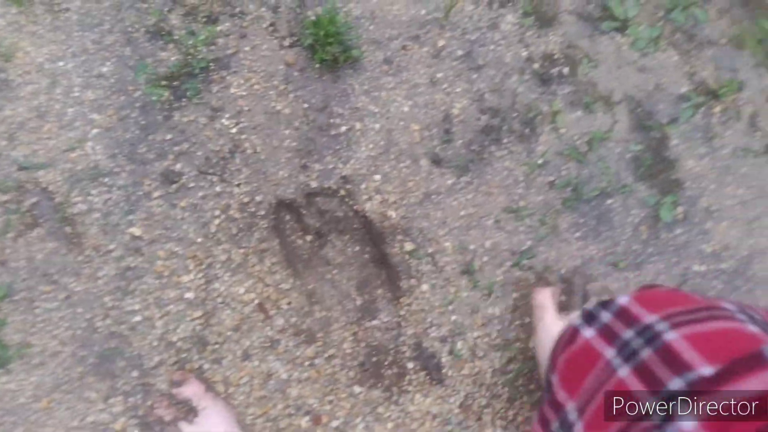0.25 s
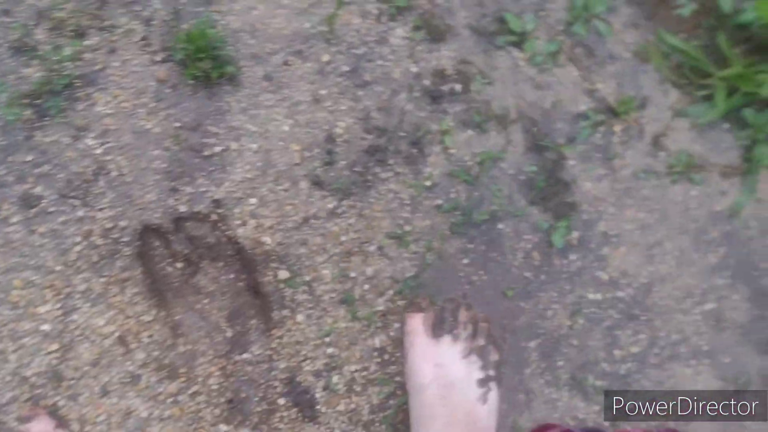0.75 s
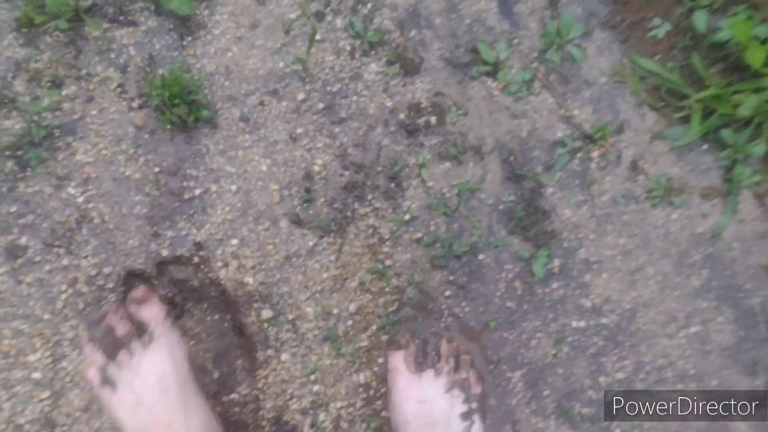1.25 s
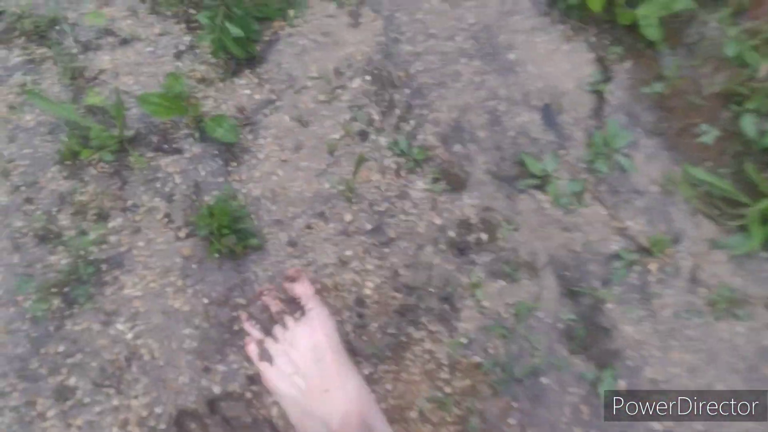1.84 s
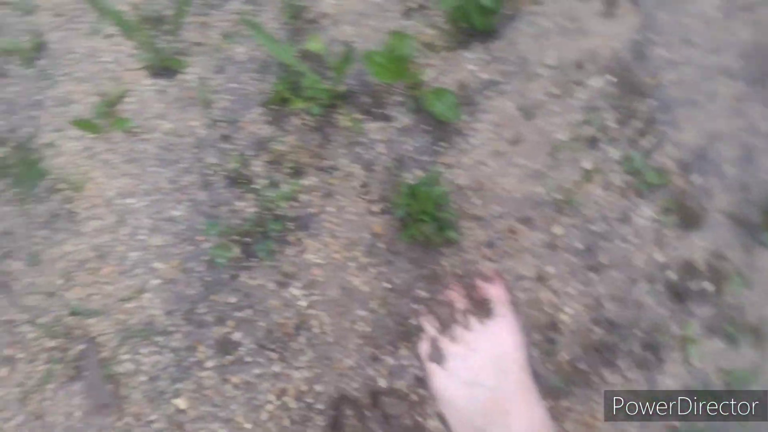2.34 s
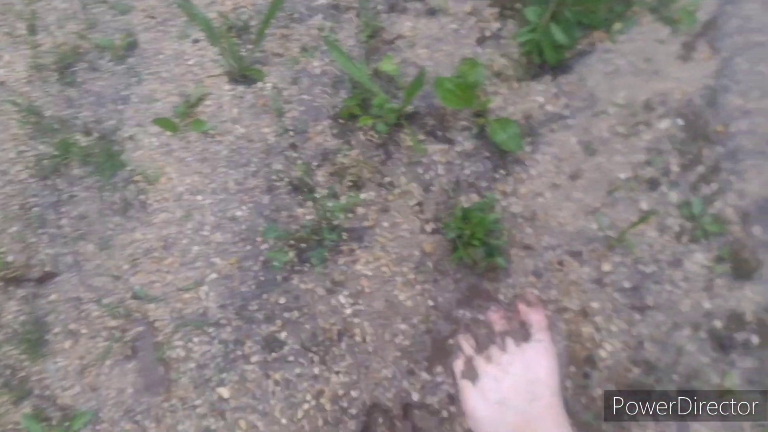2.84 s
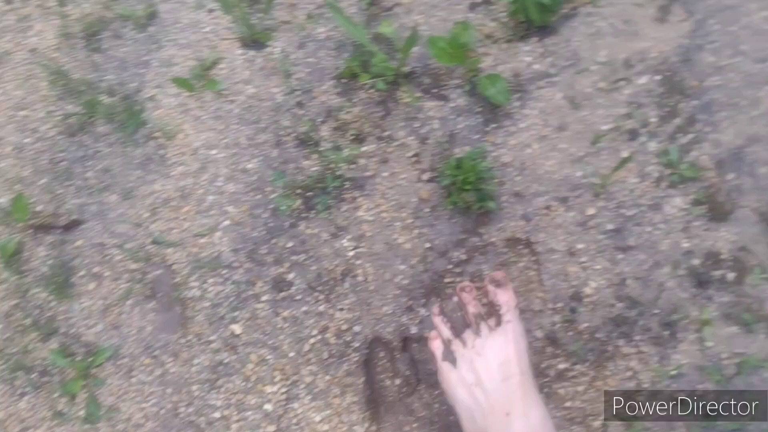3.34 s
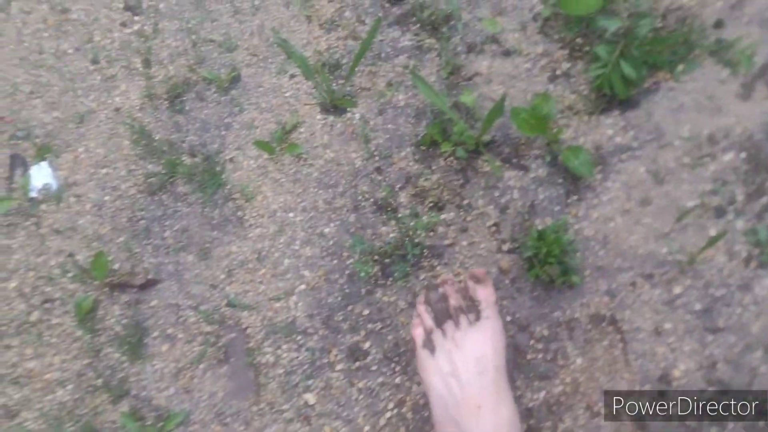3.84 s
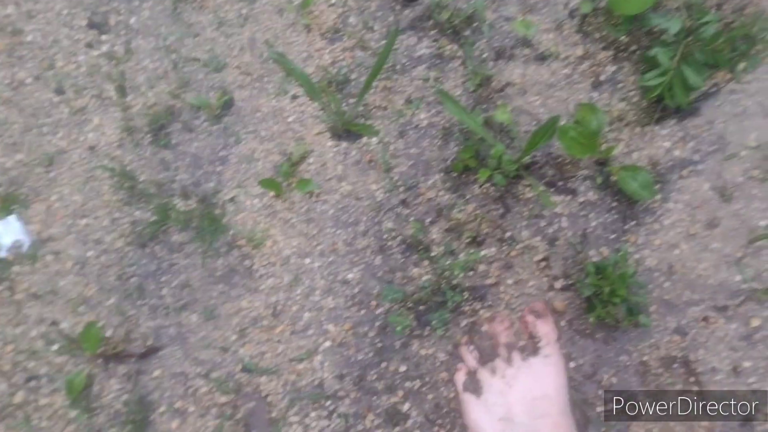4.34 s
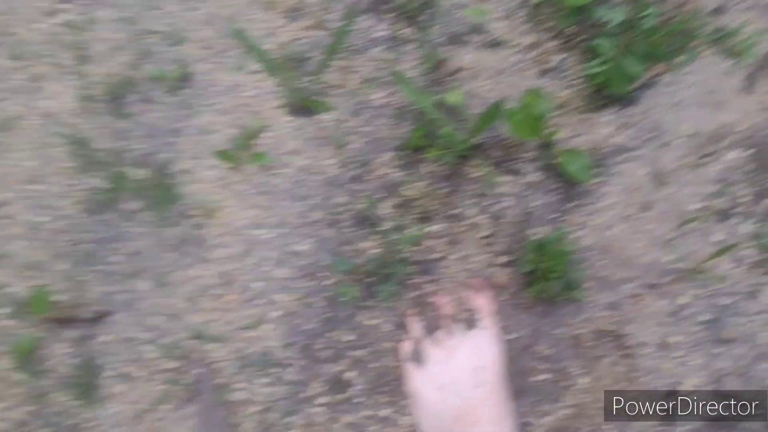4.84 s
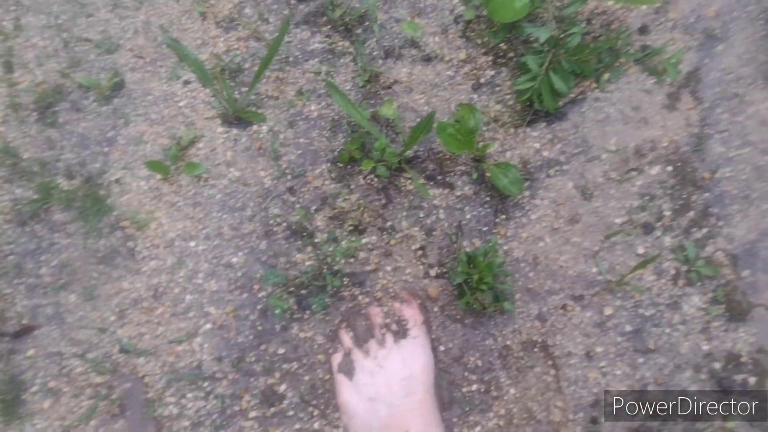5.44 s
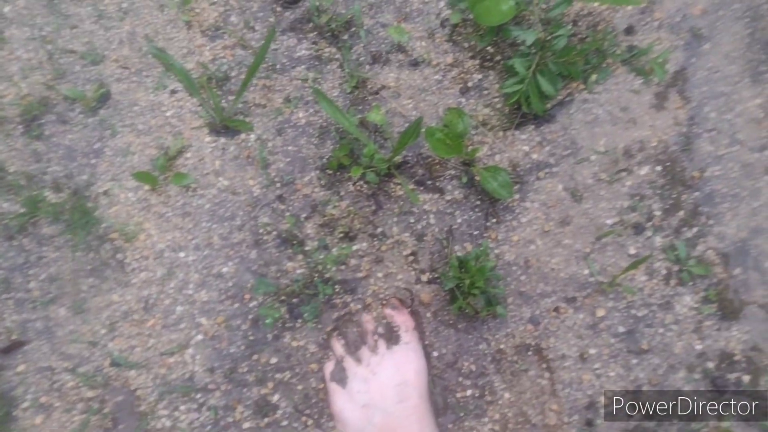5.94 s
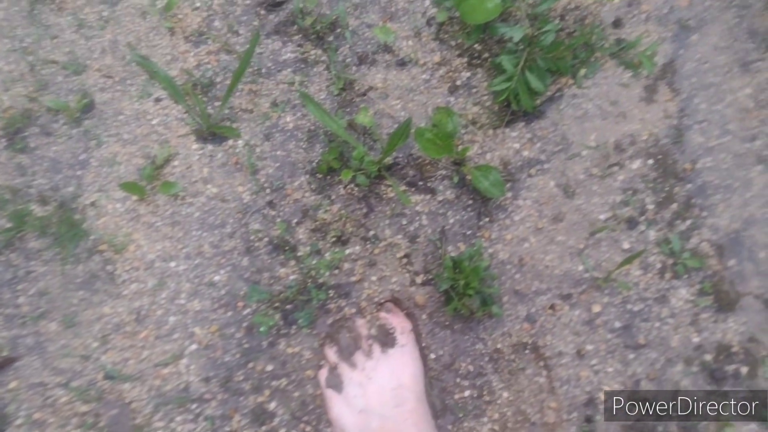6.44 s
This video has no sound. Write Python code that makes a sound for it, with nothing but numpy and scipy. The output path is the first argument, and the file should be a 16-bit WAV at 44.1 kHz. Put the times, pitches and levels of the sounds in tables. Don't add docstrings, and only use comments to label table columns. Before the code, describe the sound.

Steady fine rain hiss with small drops and tiny wet grains crackling underneath. Hard, dry casing knocks and soft low thumps arrive in irregular bunches, strongest before two seconds and around four, where grit rasps very briefly underfoot. Handling rustle and rumble swell with the movement, then settle into a sparse stretch with a few final taps. Very close microphone, outdoors without echo, left-heavy, the right port covered by a finger.

```python
import sys
import numpy as np
from scipy import signal
from scipy.fft import rfft, irfft, next_fast_len
from scipy.io import wavfile
from scipy.ndimage import map_coordinates

SR = 44100
rng = np.random.default_rng(int(sys.argv[2]) if len(sys.argv) > 2 else 0)


def master(y):
    cut = np.clip(np.atleast_2d(y).T, -1, 1)
    pcm = np.round(cut * 32767)
    wavfile.write(sys.argv[1], SR, pcm.astype(np.int16))


def natural_amplitude(level_db):
    exponent = np.asarray(level_db, float) / 20
    return 10 ** exponent


N = 295533
TIME = np.arange(N) / SR

# time in seconds, movement in dB over stillness.
MOVEMENT = [(0.0, 8), (0.2, 1.5), (0.86, 0), (1.27, 2), (1.92, 4), (2.07, 8), (2.22, 2.5), (2.48, 1.5),
            (3.28, 0), (3.58, 5), (3.78, 10), (4.03, 8), (4.23, 6.5), (4.38, 4.5), (4.59, 0), (6.31, 0.5),
            (6.57, 3), (6.7, -1.5)]
POLARITY = 0.6
SHELL_HZ = 2050


def unit(x):
    return x / np.sqrt(np.mean(x ** 2) + 1e-20)


def curve(rows):
    s, db = np.transpose(rows)
    return np.interp(TIME, s, db)


def wobble(rate):
    knots = rng.standard_normal(int(N * rate / SR) + 4)
    return map_coordinates(knots, [np.arange(N) * rate / SR])


def filtered(x, response):
    m = next_fast_len(N + SR // 2)
    return irfft(rfft(x, m) * response(np.fft.rfftfreq(m, 1 / SR)), m)[..., :N]


def highpass(x, edge_hz, order):
    return filtered(x, lambda f: (1j * f / edge_hz / (1 + 1j * f / edge_hz)) ** order)


def hiss(spectrum, grain_db):
    f, level = np.transpose(spectrum)
    grains = natural_amplitude(grain_db * wobble(400)) * rng.standard_normal(N)
    return unit(filtered(grains, lambda hz: natural_amplitude(np.interp(np.log(hz + 1), np.log(f), level))))


def add(out, s, shape):
    part = out[max(round(s * SR), 0):][:len(shape)]
    part += shape[:len(part)]


def ring(hz, db, t60, rise_s, phase):
    t = np.arange(SR // 30) / SR
    envelope = natural_amplitude(db - 60 * t / t60) * (1 - np.exp(-t / rise_s))
    return envelope * np.sin(2 * np.pi * hz * t + phase)


def pluck(hz, db, turns, sag, phase):
    cycles = hz * np.arange(SR // 16) / SR
    swell = cycles / turns * np.exp(1 - cycles / turns)
    sagging = cycles * (1 - sag * (1 - np.exp(-cycles)))
    return natural_amplitude(db) * swell * np.sin(2 * np.pi * sagging + phase)


def crack(db, life_s):
    t = np.arange(SR // 100) / SR
    swell = t / life_s * np.exp(1 - t / life_s)
    return natural_amplitude(db) * swell * (np.diff(rng.standard_normal(len(t) + 1)) + 1)


def drone():
    # pitch in Hz, pitch wander in Hz, level in dB.
    motor_hums = [(122.3, 4.87, -76.5), (192, 7.26, -77), (240, 2.96, -66), (340, 4.75, -79)]
    out = np.zeros(N)
    for hz, wander_hz, db in motor_hums:
        strength = natural_amplitude(db + 8.0 + 2.3 * wobble(14))
        cycles = hz * TIME + np.cumsum(wander_hz * wobble(14)) / SR
        out += strength * np.sin(2 * np.pi * cycles)
    return out


def stir():
    # frequency in Hz, density in dB per Hz.
    rumble_spectrum = [(20, -45), (40, -46), (70, -5), (120, -1), (200, -3), (300, -5), (500, -61)]
    rustle_spectrum = [(120, -44), (250, -1), (350, -2), (700, -4.5), (1000, -10), (1600, -28.5)]
    rain_spectrum = [(500, -42), (900, -2), (1500, -0.5), (2300, 0.5), (2900, -1.5), (3500, -11),
                     (4500, -34)]
    fizz_spectrum = [(2500, -46), (3500, -2.5), (4500, 0.5), (5500, -4), (7000, -6), (10000, -12),
                     (15000, -21), (20000, -27)]
    grit_spectrum = [(500, 9), (2000, 0.5), (5500, 2.5), (9000, -5.5), (15000, -20), (20000, -23)]
    # time in seconds, level in dB.
    scrape_level = [
        (4.118, -130),
        (4.126, -62),
        (4.132, -39.5),
        (4.14, -36),
        (4.156, -37),
        (4.162, -50),
        (4.172, -45),
        (4.178, -60),
        (4.186, -130),
    ]
    still_db = (-70, -65, -61.5, -64.5)
    growth = (1.6, 0.9, 0.58, 0.011)
    movement_db = curve(MOVEMENT)
    rumble_db, rustle_db, rain_db, fizz_db = [db + k * movement_db for db, k in zip(still_db, growth)]

    lumps_db = 4.5 * np.tanh(wobble(30) / 1.5)
    rumble = natural_amplitude(rumble_db + 7.5 + lumps_db) * hiss(rumble_spectrum, grain_db=3)
    rustle = natural_amplitude(rustle_db + 3.5 + 2.17 * wobble(70)) * hiss(rustle_spectrum, grain_db=1.0)
    rain = natural_amplitude(rain_db + 7.5) * hiss(rain_spectrum, grain_db=0.53)
    fizz = natural_amplitude(fizz_db + 6.5) * hiss(fizz_spectrum, grain_db=1.03)
    gusts = natural_amplitude(0.8 * wobble(15))
    scrape = natural_amplitude(curve(scrape_level) - 0.3) * hiss(grit_spectrum, grain_db=5.0)
    return rumble + rustle + gusts * (rain + fizz) + scrape


def drizzle():
    out = np.zeros(N)
    for when, pitch, size, phase in rng.random((260, 4)):
        hz = 500 * 22 ** pitch
        db = -53 - 14 * pitch + 2.5 * size
        add(out, when * N / SR, ring(hz, db, t60=14 / hz, rise_s=0.00022, phase=2 * np.pi * phase))
    return out


def squelch():
    lowest_hz, span = 250, 9.7
    base_db, spread_db = -53.5, 4.5
    out = np.zeros(N)
    crowding = np.cumsum(natural_amplitude(2.7 * curve(MOVEMENT)))
    for when, pitch, size, phase in rng.random((150, 4)):
        hz = lowest_hz * span ** pitch
        db = base_db - 4.5 * pitch + spread_db * 2 * size ** 2
        s = np.searchsorted(crowding, when * crowding[-1]) / SR
        add(out, s, ring(hz, db, t60=9.5 / hz, rise_s=0.00033, phase=2 * np.pi * phase))
    return out


def covered_port():
    # frequency in Hz, density in dB per Hz.
    muffled_spectrum = [(20, -14), (60, 1), (130, 1), (250, -3), (500, -9.5), (800, -14.5), (1500, -48)]
    thin_spectrum = [(400, -30), (900, 1.5), (2500, 1.5), (3500, -0.5), (6000, -18.5), (12000, -7.5),
                     (20000, -9)]
    # time in seconds, pitch in Hz, level in dB.
    muffled_thumps = [
        (1.546, 180, -52),
        (3.786, 200, -62),
        (3.881, 300, -52.5),
        (3.9794, 330, -44),
    ]
    rub_s, rub_length_s = 3.95, 0.09
    leak = 0.3
    rub = np.exp(-((TIME - rub_s) / rub_length_s) ** 2)
    rumble_db = -73.5 + 8 * rub + leak * curve(MOVEMENT)
    hiss_db = -82 + 5 * rub
    out = natural_amplitude(rumble_db - 2.0 + 2.4 * wobble(16)) * hiss(muffled_spectrum, grain_db=0.3)
    out += natural_amplitude(hiss_db) * hiss(thin_spectrum, grain_db=-3.0)
    for s, hz, db in muffled_thumps:
        add(out, s, pluck(hz, db, turns=0.39, sag=0.1, phase=np.pi))
    return out


def standouts():
    # time in seconds, pitch in Hz, level in dB.
    shell_rings = [(0.104, 1710, -31), (.364, 940, -41), (1.528, 2160, -34), (1.527, 3420, -33),
                   (1.567, 4340, -31), (1.602, 850, -19.5), (1.807, 5630, -39.5), (1.902, 1920, -36.5),
                   (2.037, 1190, -29), (2.1425, 1030, -30.5), (2.143, 3150, -40), (2.421, 7500, -45),
                   (2.422, 2370, -28), (2.778, 5000, -41.5), (3.3732, 2050, -38), (3.5684, 14400, -37),
                   (3.5691, 5000, -28.5), (3.7736, 14500, -42), (3.5686, 920, -24), (3.5685, 2170, -37),
                   (3.569, 3100, -26.5), (3.675, 1010, -34), (3.7746, 1020, -27.5), (3.775, 3140, -24),
                   (4.1881, 5560, -29.5), (4.1877, 995, -22), (4.188, 2590, -34), (5.986, 2100, -37),
                   (6.5079, 3320, -41), (6.541, 1150, -34)]
    # time in seconds, pitch in Hz, level in dB.
    body_booms = [(.001, 160, -37.5), (1.252, 352, -25.5), (1.911, 278, -35.5), (1.946, 250, -35),
                  (2.7793, 298, -29), (3.5697, 332, -24), (4.188, 240, -20), (5.655, 136, -44),
                  (6.259, 139, -46), (6.418, 210, -43), (6.522, 121, -38)]
    rows = shell_rings + body_booms
    out = np.zeros(N)
    for (s, hz, db), phase in zip(rows, POLARITY * rng.standard_normal(len(rows))):
        t60 = 0.0058 + 6.3 / hz
        add(out, s - 0.0006, ring(hz, db + 9.5, t60, rise_s=0.00026, phase=phase))
    return out


def knocks():
    # time in seconds, knock pitch in Hz, knock level in dB, shell level in dB, crack level in dB.
    sharp_knocks = [(0.1037, 850, -47, -33.5, -47), (1.2518, 452, -25, -30, -36),
                    (1.527, 800, -23.5, -33.5, -34), (1.5661, 476, -44, -34.5, -37.5),
                    (1.5728, 312, -25, -32, -49), (1.5817, 333, -25.5, -29, -28.5),
                    (1.6037, 745, -28.5, -35.5, -31.5), (1.6365, 710, -46, -40, -41),
                    (1.8081, 920, -39, -35.5, -32.5), (1.9045, 480, -30.5, -40, -42),
                    (1.9581, 477, -25, -38, -42), (2.0735, 513, -33.5, -43, -39),
                    (2.1432, 1026, -48, -49.5, -40), (2.4225, 690, -34.5, -24.5, -34.5),
                    (2.7789, 423, -33.5, -40, -40.5), (3.5686, 740, -29, -19.5, -25.5),
                    (3.7741, 675, -13.5, -20, -28), (3.787, 440, -21, -32.5, -38),
                    (3.8909, 340, -37, -39.5, -45), (4.1881, 547, -20.5, -21.5, -22.5),
                    (4.3071, 462, -22, -32, -32.5), (5.987, 800, -27, -26.5, -32),
                    (6.5079, 480, -25.5, -43, -39), (6.54, 450, -33.5, -41, -44)]
    # time in seconds, knock pitch in Hz, level in dB.
    firm_taps = [(0.007, 358, -39), (0.3634, 392, -43), (1.336, 756, -43), (1.545, 436, -35),
                 (1.6146, 340, -35.5), (1.884, 640, -43), (2.0375, 960, -37.5), (2.1728, 370, -42),
                 (3.3728, 340, -45), (3.674, 503, -42), (3.6948, 380, -39.5), (3.7088, 306, -34.5),
                 (3.854, 402, -33.5), (3.882, 500, -38.5), (4.131, 754, -44), (4.1465, 365, -55),
                 (4.1501, 386, -34), (4.198, 360, -37), (5.552, 312, -44.5)]
    # time in seconds, knock pitch in Hz, level in dB.
    dull_taps = [(0.2545, 365, -47), (1.312, 830, -35.5), (1.578, 410, -29), (2.0454, 537, -44),
                 (2.2368, 455, -42.5), (2.659, 550, -42.5), (2.7974, 364, -48.5), (3.546, 970, -40.5),
                 (3.9366, 440, -40), (3.982, 398, -36), (4.0057, 420, -44.5), (4.16, 353, -34.5),
                 (4.17, 390, -49), (5.6257, 308, -39.5), (6.3518, 580, -29), (6.5154, 360, -37.5),
                 (6.609, 500, -33.5)]
    # time in seconds, shell level in dB, crack level in dB.
    nail_snaps = [
        (0.553, -45.5, -54),
        (0.5659, -45, -47),
        (1.8716, -46, -33),
        (2.7029, -52, -55),
        (3.2067, -48, -39),
        (3.6442, -46, -69),
        (4.106, -43.5, -42),
        (4.2963, -40, -47),
    ]
    firm = [(s, hz, db, db - 4, db - 14) for s, hz, db in firm_taps]
    dull = [(s, hz, db, db - 19.5, db - 24) for s, hz, db in dull_taps]
    snaps = [(s, SHELL_HZ, -np.inf, shell_db, crack_db) for s, shell_db, crack_db in nail_snaps]
    return sharp_knocks + firm + dull + snaps


def contacts():
    # pitch in Hz, level in dB, 60 dB decay in seconds.
    casing_modes = [(1150, 1.5, 0.0097), (1512, -1, 0.0099), (1916, -1.5, 0.0065), (2304, -6, 0.011),
                    (2763, 3.5, 0.0065), (3330, -5.5, 0.0069), (4380, -6, 0.0037), (5030, -8.5, 0.0055),
                    (6300, -12, 0.0035), (7370, -10.5, 0.0029)]
    # time in seconds, pitch in Hz, level in dB.
    grit_ticks = [(0.56, 5900, -43), (0.7413, 5070, -57), (0.7777, 4890, -48), (0.787, 6880, -51),
                  (1.091, 4720, -60.5), (1.1374, 5620, -54.5), (1.6756, 7200, -45), (2.2963, 8070, -43.5),
                  (2.4878, 4790, -62), (2.5163, 5800, -54), (2.6959, 5130, -52.5), (3.1603, 10000, -50.5),
                  (3.3459, 4530, -55.5), (3.525, 7940, -57), (4.001, 5500, -48), (4.0802, 6070, -49),
                  (4.279, 5380, -39), (4.6629, 6200, -51), (5.11, 6300, -49.5), (5.6646, 4800, -58),
                  (5.8746, 6240, -51), (6.1036, 5470, -57), (6.6898, 5240, -53)]
    out, cracks = np.zeros(N), np.zeros(N)
    for s, hz, db, shell_db, crack_db in knocks():
        phase = POLARITY * rng.standard_normal(2)
        add(out, s - 0.0006, pluck(hz, db + 10.0, turns=0.28, sag=0.077, phase=phase[0]))
        add(out, s + 0.00021, ring(1.223 * hz, db, t60=11.7 / hz, rise_s=0.00041, phase=phase[1]))
        spots = rng.random((len(casing_modes), 4))
        for (mode_hz, mode_db, t60), (detune, extra, turn, late) in zip(casing_modes, spots):
            reach_db = -7.5 * np.log2(mode_hz / SHELL_HZ) ** 2
            driven_db = crack_db + 5.5 - 25 * (mode_hz < 4000)
            level_db = np.logaddexp((shell_db + reach_db) / 4, driven_db / 4) * 4
            mode = ring(mode_hz * (0.944 + 0.11 * detune), level_db + mode_db + 2.9 * extra + 3.5,
                        t60, rise_s=0.0003, phase=2 * np.pi * turn)
            add(out, s - 0.0005 + 0.0008 * late, mode)
        add(cracks, s - 0.0012, crack(crack_db - 0.6, life_s=0.00026))
    for (s, hz, db), phase in zip(grit_ticks, rng.uniform(0, 2 * np.pi, len(grit_ticks))):
        add(out, s - 0.0005, ring(hz, db + 9.5, t60=0.0042, rise_s=0.00022, phase=phase))
        add(cracks, s - 0.0009, crack(db + 5.5, life_s=0.00063))
    thinned = highpass(cracks, 3500, order=2)
    return out + filtered(thinned, lambda f: 1 / (1 + 1j * f / 9000) ** 2)


def pushes():
    # time in seconds, pitch in Hz, level in dB.
    hand_thumps = [(0.3616, 207, -46.5), (1.525, 180, -41), (1.5718, 156, -29), (1.5993, 237, -31),
                   (1.616, 210, -41), (1.9002, 196, -32.5), (1.9578, 237, -30.5), (2.0356, 225, -40),
                   (2.0706, 151, -36), (2.42, 210, -46.5), (2.78, 240, -43), (3.6719, 202, -40.5),
                   (3.7076, 226, -40.5), (3.7717, 216, -38), (3.9647, 210, -42), (4.0139, 161, -42.5),
                   (4.1316, 210, -44), (4.1538, 190, -43), (4.1883, 209, -30.5), (5.5529, 165, -37),
                   (5.6234, 212, -40.5), (5.9868, 180, -42), (6.0085, 200, -47), (6.5365, 198, -45)]
    # time in seconds, level in dB.
    heel_jolts = [(1.545, -33), (2.1721, -38.5), (3.5712, -32), (3.7868, -31), (3.8482, -30.5),
                  (3.888, -41), (3.936, -35.5), (3.9823, -37), (4.0028, -40), (4.28, -44), (4.306, -21.5),
                  (4.333, -38.5)]
    arm_hz = 118.6
    rows = hand_thumps + [(s, arm_hz, db) for s, db in heel_jolts]
    out = np.zeros(N)
    for (s, hz, db), phase in zip(rows, POLARITY * rng.standard_normal(len(rows))):
        add(out, s, pluck(hz, db + 8.0, turns=0.43, sag=0.041, phase=phase))
    return highpass(out, 54.4, order=3)


def scene():
    hum = drone()
    hits = highpass(contacts() + standouts(), 193, order=2) + pushes()
    open_port = hits + drizzle() + squelch() + highpass(stir(), 35, order=2) + hum
    return np.array([open_port, covered_port() + natural_amplitude(-31) * hum])


def roll_off(x):
    return signal.sosfilt(signal.butter(12, 16440, fs=SR, output="sos"), x)


def record(dry):
    top_hz, slope_hz = 15850, 500
    mix = filtered(dry, lambda f: np.clip((top_hz - f) / slope_hz, 0, 1))
    return roll_off(mix)


dry = scene()
out = record(dry)
master(out)
```